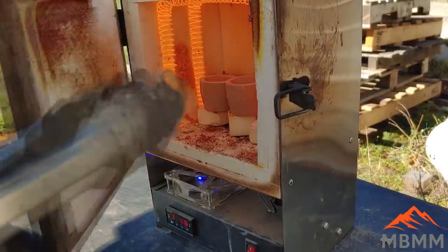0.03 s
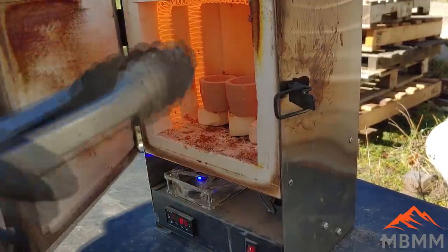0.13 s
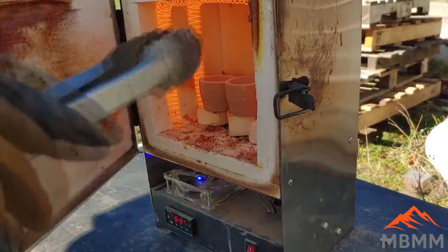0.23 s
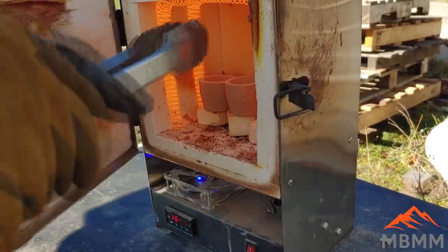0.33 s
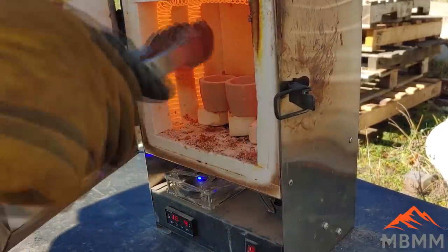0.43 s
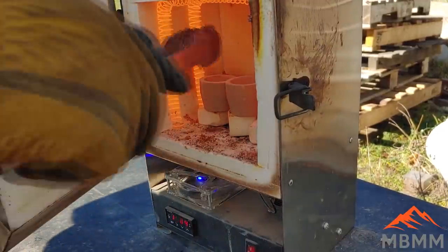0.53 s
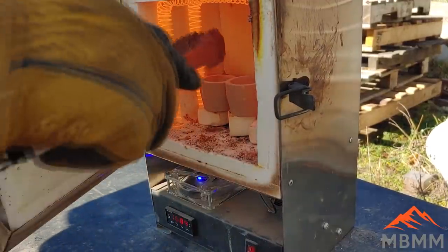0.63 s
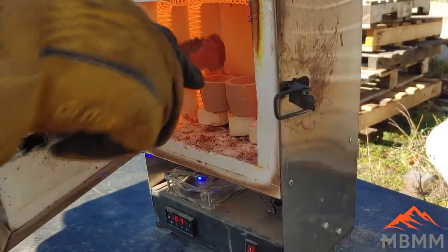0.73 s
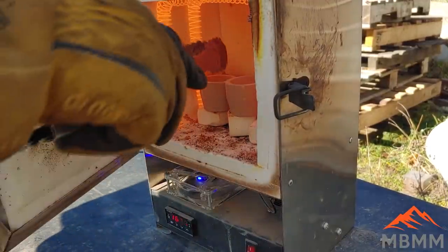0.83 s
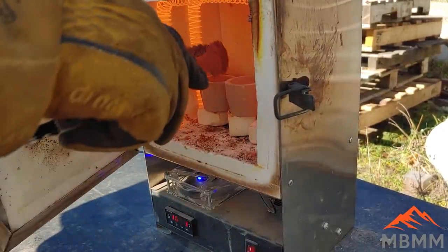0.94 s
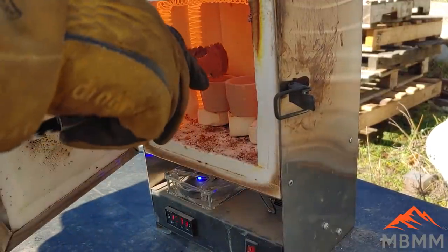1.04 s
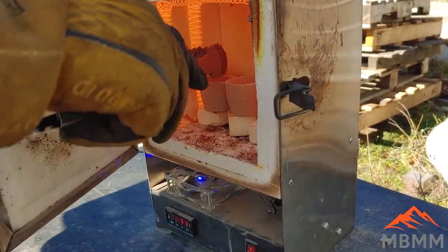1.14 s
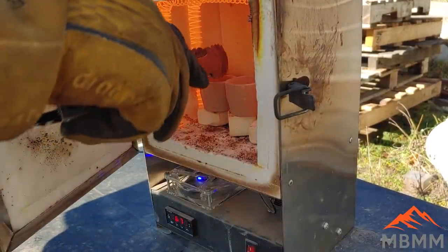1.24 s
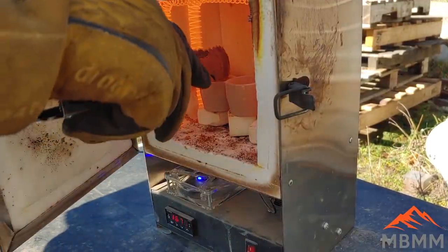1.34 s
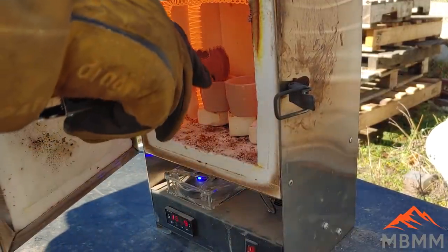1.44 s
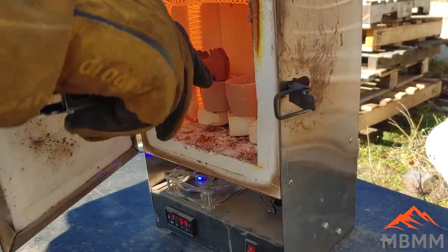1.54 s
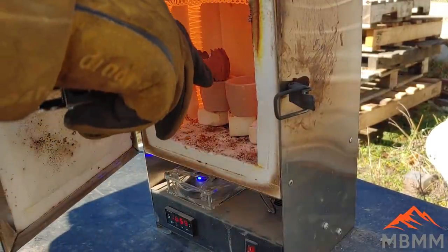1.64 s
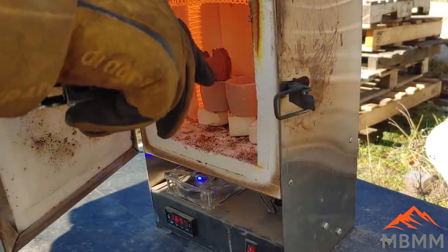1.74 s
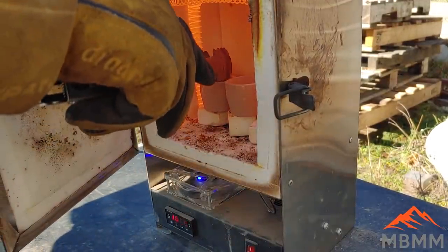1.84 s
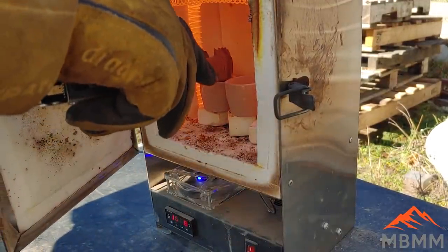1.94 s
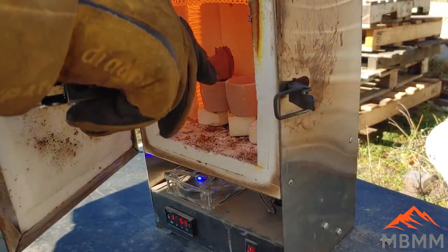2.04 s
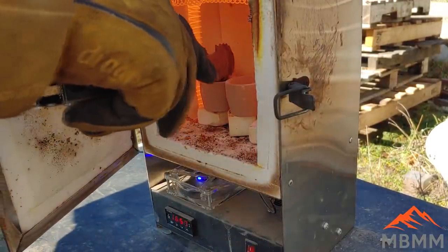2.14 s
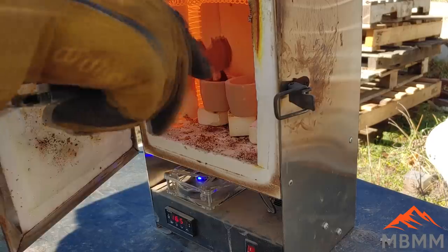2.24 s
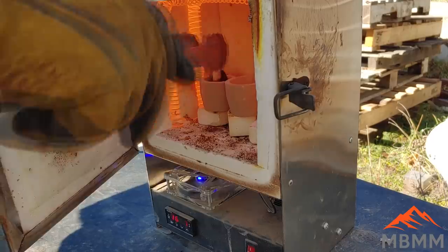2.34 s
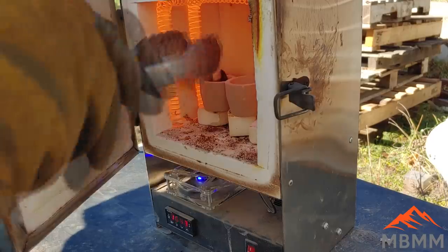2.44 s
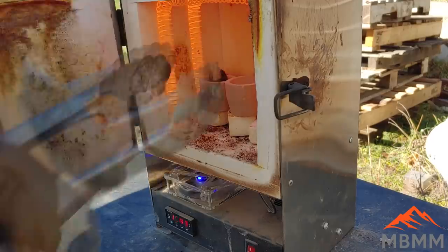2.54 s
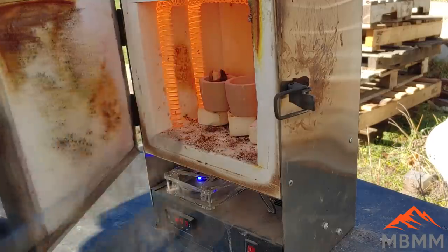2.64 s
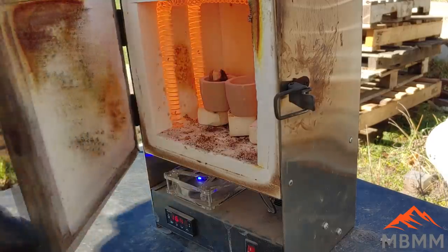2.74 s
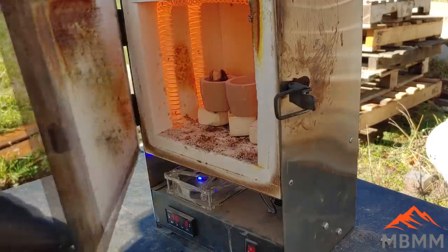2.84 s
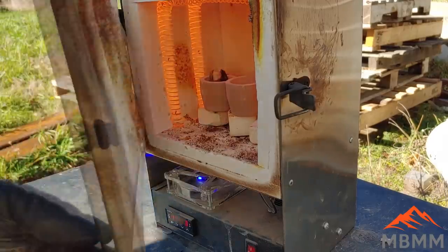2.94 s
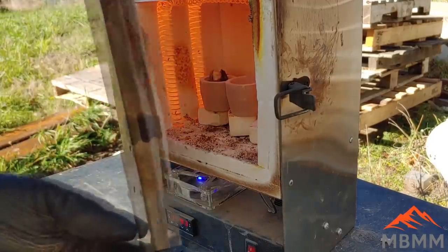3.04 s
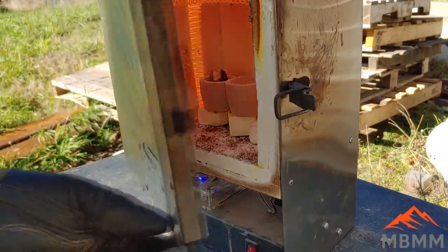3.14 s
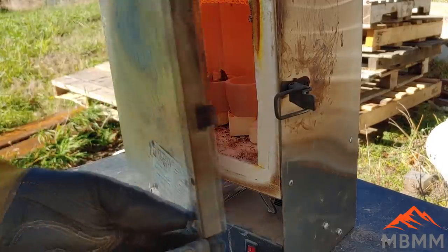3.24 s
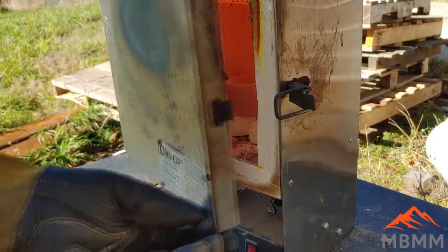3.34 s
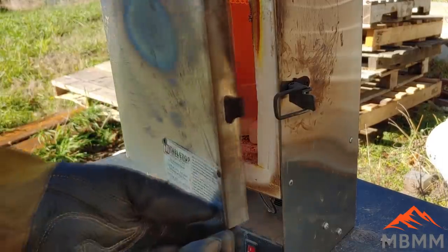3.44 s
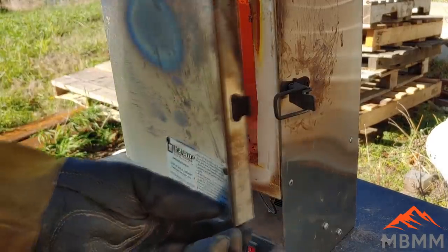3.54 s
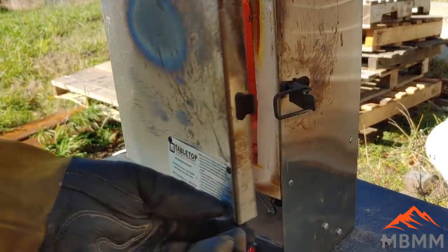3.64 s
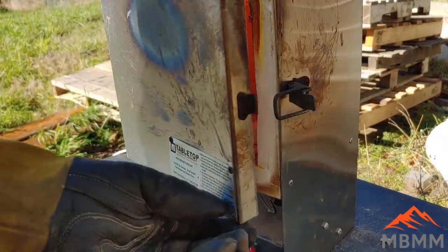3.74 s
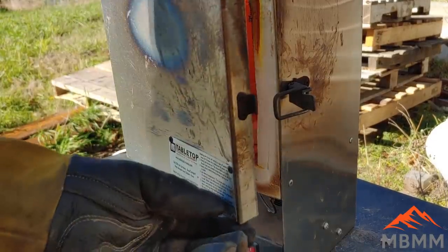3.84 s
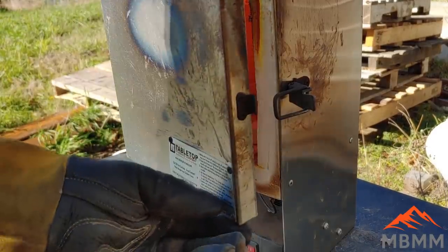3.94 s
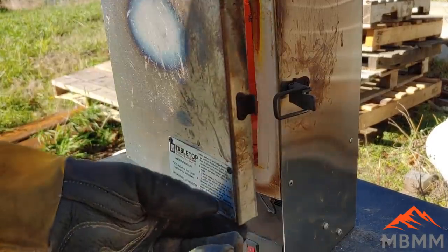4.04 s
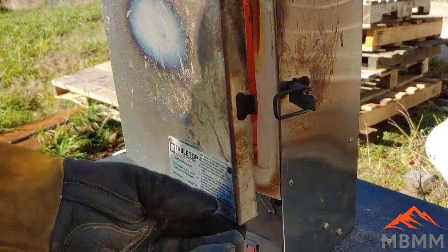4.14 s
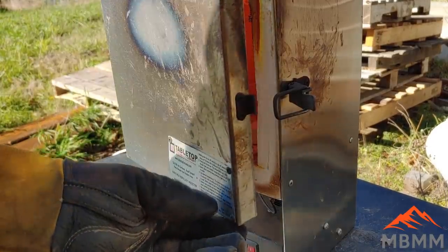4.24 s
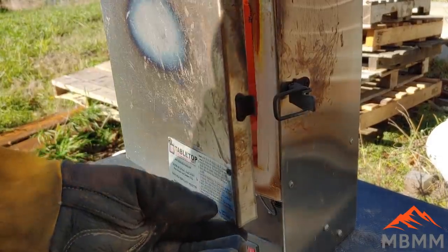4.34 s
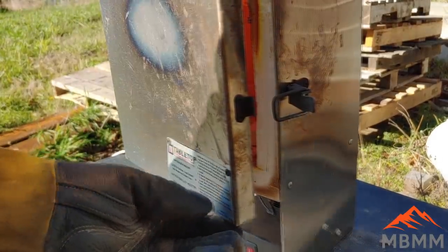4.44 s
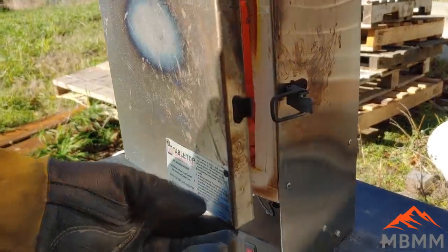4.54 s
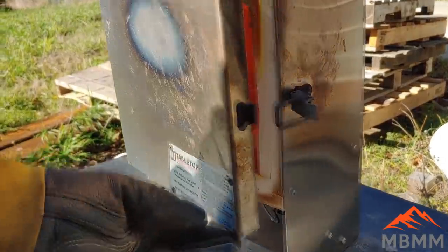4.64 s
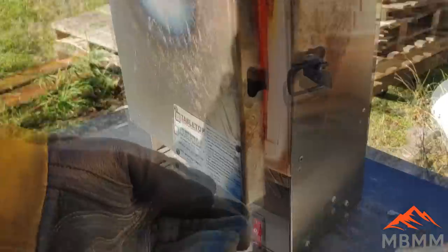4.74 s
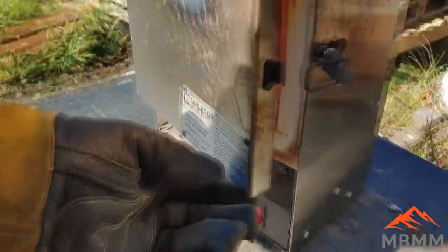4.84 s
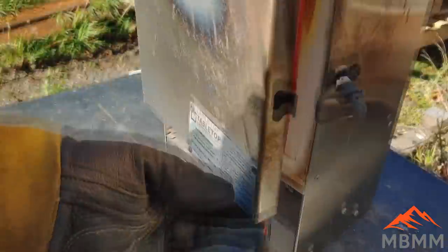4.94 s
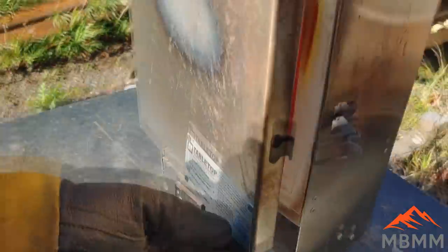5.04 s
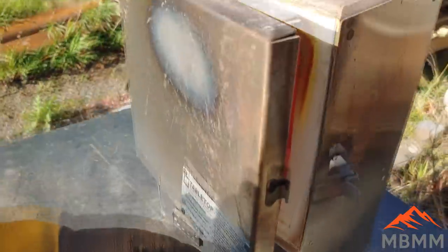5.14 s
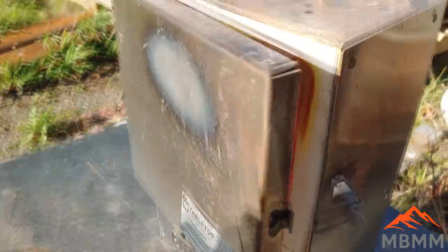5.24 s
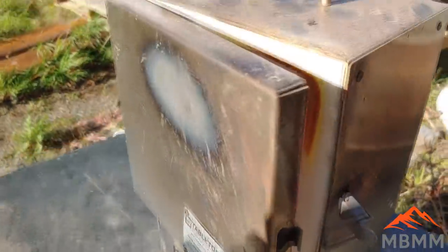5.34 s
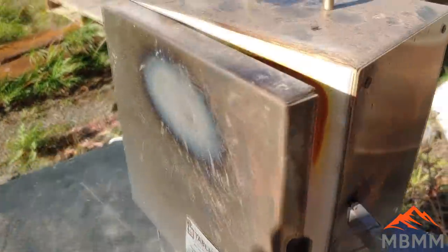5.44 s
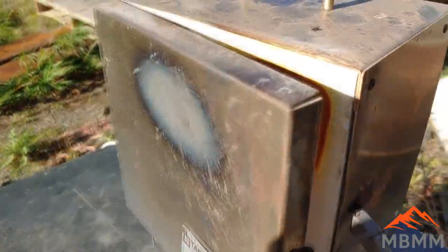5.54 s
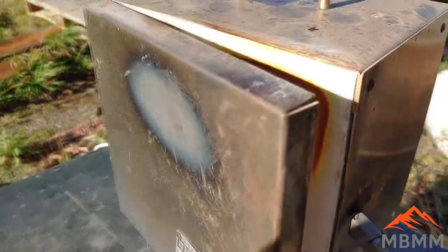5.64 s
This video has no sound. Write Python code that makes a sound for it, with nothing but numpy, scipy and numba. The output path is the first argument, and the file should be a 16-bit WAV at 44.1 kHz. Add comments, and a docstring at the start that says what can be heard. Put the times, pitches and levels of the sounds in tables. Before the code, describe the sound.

A few faint metallic clicks outdoors, then a sheet-steel furnace door clatters, bangs and rattles shut with ringing latch and wind rumble.

```python
"""Furnace door and tongs outdoors

Steel tongs click and scrape on crucibles in a small furnace; then its sheet-steel door bangs and rattles to,
the loose latch rings and the casing booms. Blows and rubbing are noise forces that ring banks of decaying modes.
Wind on the two microphone ports and an open-air hush are shaped noise.
"""
import sys
import numpy as np
from scipy import signal
from scipy.fft import rfft, irfft
from scipy.io import wavfile
from scipy.ndimage import uniform_filter1d
from numba import njit

SR = 44100
rng = np.random.default_rng(int(sys.argv[2]) if len(sys.argv) > 2 else 0)


def bounce(signal):
    """Save signal as a 16-bit WAV file at the path given by the first command-line argument."""
    frames = np.transpose(np.atleast_2d(signal))
    limited = np.clip(frames, -1, 1)
    pcm = np.round(limited * 32767).astype(np.int16)
    wavfile.write(sys.argv[1], SR, pcm)


N = 251628


def undb(db):
    """Amplitude ratio of a level in dB."""
    return 10 ** (np.asarray(db) / 20)


def curve(table):
    """Columns of a table, joined by straight lines in time."""
    time_s, *columns = np.transpose(table)
    return [np.interp(np.arange(N) / SR, time_s, column) for column in columns]


def during(table):
    """1 while a curve table lasts, else 0."""
    t = np.arange(N) / SR
    return (t >= table[0][0]) & (t <= table[-1][0])


def at_hz(table, hz):
    """A spectrum table read on a log-frequency axis."""
    table_hz, value = np.transpose(table)
    return np.interp(np.log(hz), np.log(table_hz), value)


def sides(pan_db):
    """Left and right gains that differ by pan_db."""
    return undb(np.array([pan_db, -pan_db]) / 2)


def coloured(table):
    """Noise of rms 1 with the given spectrum."""
    hz = np.arange(1, N // 2 + 2) * SR / N
    x = irfft(rfft(rng.standard_normal(N)) * undb(at_hz(table, hz)), N)
    return x / np.std(x)


def flutter(depth_db, rate_per_s):
    """Gain that wanders by itself on each port: smoothed random steps in dB."""
    k = int(SR / rate_per_s)
    steps = np.repeat(rng.standard_normal((2, N // k + 1)), k, axis=1)
    smooth = uniform_filter1d(uniform_filter1d(steps, k, axis=1), k // 2, axis=1)
    return undb(depth_db * smooth[:, :N])


def grit(spread_db, apart):
    """Dense tiny impacts of uneven size, rms 1; the fraction apart is independent on each port."""
    size = undb(spread_db * np.minimum(rng.exponential(size=N), 4))
    apart = np.clip(apart, 0, 1)
    shared = np.sqrt(1 - apart) * rng.standard_normal(N)
    x = size * (shared + np.sqrt(apart) * rng.standard_normal((2, N)))
    return x / np.std(x)


def chatter(times_s, db, t60_s, rise_s, pan_db):
    """Force envelope: every blow swells quickly and dies away as chatter."""
    out, t = np.zeros((2, N)), np.arange(SR // 2) / SR
    blows = np.broadcast(times_s, db, np.clip(t60_s, .004, 1), np.clip(rise_s, .0001, .03), pan_db)
    for start_s, level_db, decay_s, up_s, pan in blows:
        i = int(start_s * SR)
        shape = 1000 ** (-t / decay_s) * (1 - np.exp(-t / up_s))
        force = undb(level_db) * sides(pan)[:, None] * shape / shape.max()
        out[:, i:i + len(t)] += force[:, :N - i]
    return out


@njit
def resonate(force, blow, poles, gains, turn):
    """Decaying modes weight the force anew at each blow; the right port hears them phase-turned."""
    out = np.zeros((2, force.shape[1]))
    for m in range(len(poles)):
        left, right = 0j, 0j
        for i in range(force.shape[1]):
            left = left * poles[m] + force[0, i] * gains[blow[i], m]
            right = right * poles[m] + force[1, i] * gains[blow[i], m]
            out[0, i] += left.imag
            out[1, i] += (right * turn[m]).imag
    return out


def ring(force, times_s, modes, scatter_db, turn_rad):
    """A body rung by the force; every blow lands elsewhere and shares its energy among the modes anew."""
    hz, db, t60_s = np.transpose(modes)
    radius = np.exp(-np.log(1000) / (np.clip(t60_s, .005, 2) * SR))
    chance = rng.standard_normal((len(times_s) + 1, len(hz)))
    share = np.sign(chance[::-1]) * undb(db + scatter_db * chance)
    gains = share * np.sqrt(2 * (1 - radius ** 2) / np.sum(share ** 2, axis=1, keepdims=True))
    blow = np.searchsorted(np.asarray(times_s) * SR, np.arange(N))
    turn = np.exp(1j * turn_rad * rng.standard_normal(len(hz)))
    poles = radius * np.exp(2j * np.pi * hz / SR)
    out = resonate(force + 1e-18, blow, poles, gains, turn)  # offset avoids denormals
    edges_hz = [.7 * hz.min(), min(1.12 * hz.max(), .45 * SR)]
    return signal.sosfilt(signal.butter(4, edges_hz, "bandpass", fs=SR, output="sos"), out)


def sheet(colour, lo_hz, hi_hz, count, damping):
    """A random crowd of close modes that follows the colour of the steel."""
    # steel decay: (frequency [Hz], t60 at damping 1 [s])
    decay_table = [(1200, 0.017), (4000, 0.14), (8000, 0.088), (16000, 0.013)]
    hz = lo_hz + (hi_hz - lo_hz) * (np.arange(count) + rng.random(count)) / count
    return np.transpose([hz, at_hz(colour, hz), at_hz(decay_table, hz) / damping])


def steel(colour, times_s, dull, bright, top, damping, count):
    """Sheet steel as a crowd of modes; its middle, treble and top are driven apart."""
    middle_modes = sheet(colour, 1181.0, 4500, count // 2, damping)
    treble_modes = sheet(colour, 4500, 10500, count, damping)
    top_modes = sheet(colour, 10500, 15900, count // 2, damping)
    middle = ring(dull * grit(3.8, 0.57), times_s, middle_modes, 1.55, 3.47)
    treble = ring(bright * grit(6.7, 0.076), times_s, treble_modes, 0.45, 3.97)
    return middle + treble + ring(top * grit(6.2, 1.0), times_s, top_modes, 10.4, 3.0)


def cracks(times_s, db, hz, pan_db):
    """First contact of a blow: a noise burst around its pitch, gone in milliseconds."""
    out, t = np.zeros((2, N)), np.arange(SR // 50) / SR
    for start_s, level_db, pitch_hz, pan in zip(times_s, db, hz, pan_db):
        edges_hz = [.55 * pitch_hz, 1.3 * pitch_hz]
        band = signal.butter(2, edges_hz, "bandpass", fs=SR, output="sos")
        burst = signal.sosfilt(band, rng.standard_normal((3, len(t)))) * np.exp(-t / 0.0019)
        burst = burst[0] + 0.81 * burst[1:]  # shared part + one part per port
        i = int(start_s * SR)
        out[:, i:i + len(t)] += undb(level_db) * sides(pan)[:, None] * burst / np.abs(burst).max()
    return out


def door():
    """Blows and rattle drive the sheet, its clear modes, the latch and the casing."""
    # knocks: (time [s], relative level [dB], dull part [dB], chatter t60 [s], low latch ring [dB],
    # high latch ring [dB], boom [dB], left minus right [dB])
    knock_table = [(3.0543, -31, -6.5, 0.046, -74, -40, -10, 4),
                   (3.1, -35.5, -3.5, 0.057, -72, -57, -14.5, 5),
                   (3.2257, -9, -14, 0.026, -53, -24, -11.5, 0),
                   (3.2534, -10, -22, 0.074, -54, -32, -22.5, 3),
                   (3.2807, -10.5, -45, 0.11, -60, -8, -16.5, 2),
                   (3.3164, -12, -11, 0.061, -49, -28, -13.5, 6),
                   (3.326, -15.5, -8, 0.36, -42, -20, -4, -1.0),
                   (3.4217, -15.5, -34, 0.086, -56, -11, -25, -1),
                   (3.4438, -18, -30, 0.04, -59, -23, -18, -5), (3.496, -9, -23, 0.12, -53, -30, -52, 1),
                   (3.5119, -5.5, -30, 0.047, -19, -9, -66, -1.0),
                   (3.541, -15, -41, 0.037, -28.5, -4.5, -27, -3),
                   (3.5768, -16, -5.5, 0.088, -30.5, -9.5, -12.5, -8.5),
                   (3.626, -29, -20, 0.052, -56, -11, -6, -9), (3.749, -2.5, -2, 0.078, -17, -6, -32, -1.5),
                   (3.7617, -11, -33, 0.086, -33, -25, -15.5, 3),
                   (3.7973, 0.5, -35, 0.022, -47.5, -11, -57, -0.5),
                   (3.8454, -7, -29, 0.066, -25.5, -19, -21, 3),
                   (3.8555, -8.5, -8, 0.07, -27.5, -28, -31, -3), (3.9227, -7, -8.5, 0.1, -56, -28, -27, 2),
                   (3.941, -13, -17, 0.096, -29, -6, -15, 0), (3.961, -6.5, -6, 0.16, -31, -27, -43, 3.5),
                   (3.9984, -28, -30, 0.091, -54, -36, -33, 5),
                   (4.0433, -20.5, 6.5, 0.086, -45, -30, -23, -8.5),
                   (4.0486, -10.5, -5.5, 0.098, -42, -44, -25, 3),
                   (4.3049, -25, 2, 0.077, -51, -36, -7.5, 0), (4.3124, -10.5, -6, 0.093, -47, -26, -26, 1),
                   (4.328, -8, -4.5, 0.093, -36, -33, -25, 6.5),
                   (4.349, -19.5, 1.5, 0.086, -34, -27, -8, -6),
                   (4.4061, -9.5, -1.5, 0.12, -31.5, -34, -17.5, 2),
                   (4.4708, -29, -9, 0.037, -40.5, -49, -0.5, 0),
                   (4.511, -42.5, 6, 0.035, -56, -57, 6.5, -5),
                   (4.6041, -10, -1.5, 0.17, -33, -35, -22, -0.5),
                   (4.6256, -16, -9, 0.07, -34, -26, -38, 14), (4.6374, -28, -6, 0.059, -44, -32, -39, -12),
                   (4.682, -9, 0, 0.1, -46, -39, -26, 0), (4.8327, -6, -7, 0.13, -57, -32, -33, 3),
                   (4.9004, -17.5, -1.5, 0.11, -62, -44, -14, 1.5),
                   (5.005, -25, -1, 0.053, -50, -46, -21, -1),
                   (5.0697, -16.5, -2.5, 0.046, -41, -51, -13.5, 4.5),
                   (5.1652, -17.5, -1.5, 0.15, -44, -54, -20, 2.5),
                   (5.22, -39, 11, 0.07, -48, -60, 2.5, -3),
                   (5.2956, -20.5, -1.5, 0.13, -45, -45, -45, 2.5),
                   (5.358, -32.5, 3, 0.13, -46, -60, -13, 4), (5.4166, -33.5, 9, 0.13, -47, -60, -5.5, -1),
                   (5.486, -38, -8, 0.056, -66, -43, -26, -15), (5.5462, -35, 3, 0.086, -52, -66, -4.5, 1),
                   (5.6154, -45, 12.5, 0.033, -51.5, -63, -1.5, -3)]
    # rubbing and rattling between the blows: (time [s], relative level [dB])
    rattle_table = [(3.2, -55.5), (3.3, -38.5), (3.4, -38.5), (3.49, -34), (3.72, -38.5), (3.96, -34),
                    (4.1, -52), (4.2, -82), (4.3, -58), (4.6, -46), (4.98, -50.5), (5.09, -34.5),
                    (5.22, -60.5), (5.65, -53.5), (5.71, -87)]
    # casing shaken by the door: (time [s], relative level [dB])
    shake_table = [(2.9, -65.5), (3.16, -56.5), (3.4, -28), (3.59, -34), (4.08, -33.5), (4.15, -49.5),
                   (4.54, -52), (4.64, -35), (5.32, -43.5), (5.71, -49)]
    # colour of the close steel modes: (frequency [Hz], relative level [dB])
    steel_colour = [(710, -40), (1200, -17.5), (1770, -13.5), (2000, -12.5), (2680, -15), (3080, -8.5),
                    (3360, -13.5), (4960, -6.5), (5900, -8), (7330, 1), (13300, -23), (15000, -29),
                    (16000, -41)]
    # upper clear modes: (frequency [Hz], relative level [dB], t60 [s])
    upper_modes = [(4490, -7, .22), (4670, -6, .28), (5128, -1, .25), (5470, -6, .15), (5950, -5, .17),
                   (6240, -3, .22), (6500, -2, .22), (6860, 0, .2), (7085, 1, .22), (7200, 0, .17),
                   (7320, 0, .17), (7535, 1, .24), (7810, 1, .26), (8420, 0, .2), (8720, -1, .24),
                   (9200, -4, .17), (10940, -8, .12)]
    # lower clear modes: (frequency [Hz], relative level [dB], t60 [s])
    lower_modes = [(1945, -4, .25), (1975, -4, .25), (2345, 0, .16), (2735, -3, .3), (3400, -4, .25),
                   (3960, -3, .3), (3985, -3, .3), (4385, -4, .15)]
    # casing modes: (frequency [Hz], relative level [dB], t60 [s])
    casing_modes = [(132, -4, 0.085), (168, -6, 0.17), (188, -15.5, 0.092), (231.2, -1.5, 0.25),
                    (280.5, -1, 0.066), (315.9, -0.5, 0.26), (370.2, -4.5, 0.069), (443, -2.5, 0.079),
                    (490, -7.5, 0.064), (558, -10.5, 0.031), (644, -10, 0.04), (766, -14, 0.059),
                    (843, -20, 0.024), (876, -13, 0.036), (998, -10.5, 0.059), (1071, -6.5, 0.057),
                    (1180, -15.5, 0.069)]
    rise_s, swing_s = 0.0014, 3.2

    s, db, dull_db, t60_s, low_db, high_db, boom_db, pan_db = np.transpose(knock_table)
    rattle = undb(curve(rattle_table)[0]) * during(rattle_table) * flutter(4.8, 12)
    rattle = rattle + chatter(s, db - 32, 0.23, 0.0025, 0.0)  # loose parts buzz on after each knock
    blows = chatter(s, db - 9.0, t60_s, rise_s, pan_db)
    dull = chatter(s, db + dull_db - 14, t60_s, rise_s, pan_db) + rattle * undb(-3.5)

    # the sound loses its top as the door closes
    knock_top_db = -12 - 15.5 * (s - swing_s)
    rattle_top_db = -2.5 - 13 * (np.arange(N) / SR - swing_s)
    top = chatter(s, db + knock_top_db, t60_s, rise_s, pan_db) + rattle * undb(rattle_top_db)

    crowd = steel(steel_colour, s, dull, blows + rattle, top, damping=1.9, count=110)
    clear = undb(-3) * ring(blows * grit(2.5, .5), s, upper_modes, 3.5, 1.5)
    clear += undb(-5) * ring(dull * grit(2.5, .4), s, lower_modes, 4., 1.5)
    push = chatter(s, db + boom_db - 3.0, 0.19, 0.00064, -1.9)
    push = push + undb(curve(shake_table)[0]) * during(shake_table) * sides(-1.4)[:, None]
    boom = ring(push * grit(1.9, 0.12), s, casing_modes, 2.3, 0.8)
    contact = cracks(s, db - 8, np.full(len(s), 7060), pan_db)
    rings = latch(s, [low_db, high_db, high_db], pan_db)
    return crowd + clear + contact + rings + boom + hum()


def latch(times_s, rings_db, pan_db):
    """Every blow stops the ring of the loose latch and starts its decaying sines afresh."""
    # latch modes: (frequency [Hz], relative level [dB], t60 [s])
    latch_modes = [(3139, 2, .35), (7991, -12, .14), (9793, -14, .45)]
    t = np.arange(N) / SR
    blow = np.maximum(np.searchsorted(times_s, t) - 1, 0)
    since_s, out = t - times_s[blow], 0
    for (hz, mode_db, t60_s), db in zip(latch_modes, rings_db):
        decay = 1000 ** (-np.abs(since_s) / t60_s) * (since_s > 0)
        size = uniform_filter1d(undb(db[blow] + mode_db) * decay, SR // 500)  # 2 ms smoothing
        phase = 2 * np.pi * (hz * t + np.array([[0], [.2]]))  # ports 0.2 cycle apart
        out = out + size * sides(pan_db[blow]) * np.sin(phase)
    return out


def hum():
    """One low mode of the casing: a sine with 40 ms fades."""
    # (start [s], stop [s], frequency [Hz], level [dB])
    hum_settings = (3.53, 3.79, 84, -30)
    start_s, stop_s, hz, db = hum_settings
    t = np.arange(N) / SR
    swell = np.clip(np.minimum(t - start_s, stop_s - t) / .04, 0, 1)
    return undb(db) * sides(0.0)[:, None] * swell * np.sin(2 * np.pi * hz * t)


def snaps():
    """Further sharp first contacts at some blows: short bursts of band noise."""
    # (time [s], level [dB], pitch [Hz], left minus right [dB])
    snap_table = [(3.2256, -2, 7930, 0.5), (3.5119, 0, 7520, -1.0), (3.5423, -3, 7990, -0.5),
                  (3.7988, 1, 7360, 0.0), (4.2622, -42, 7900, -1.5), (4.4734, -17, 2400, 5.0)]
    return cracks(*np.transpose(snap_table))


def scuffs():
    """Soft, dull rubs of a leather glove on the steel door: enveloped noise."""
    # (time [s], relative level [dB], t60 [s], left minus right [dB])
    scuff_table = [(4.484, -29, 0.14, 16.5), (4.5194, -37.5, 0.13, 22), (4.5494, -45, 0.092, 19),
                   (4.762, -35, 0.1, 25), (4.788, -46, 0.12, 18)]
    # leather rub: (frequency [Hz], relative level [dB])
    glove_colour = [(150, -80), (600, -1), (950, -2), (1300, -2.5), (1900, -13), (2800, -41), (9000, -90)]
    s, db, t60_s, pan_db = np.transpose(scuff_table)
    own = np.array([coloured(glove_colour), coloured(glove_colour)])
    return chatter(s, db - 16.5, t60_s, 0.0085, pan_db) * (coloured(glove_colour) + 1.44 * own)


def tongs():
    """Light, well damped clicks, some with a thud, over soft rubbing."""
    # clicks: (time [s], relative level [dB], dull part [dB], relative chatter t60 [s], thud [dB],
    # left minus right [dB])
    click_table = [(0.0024, -47, -28, 0.046, -30, 8), (0.1077, -22.5, -20, 0.032, -43, -6),
                   (0.184, -32, -32, 0.037, -28, -2), (0.4216, -53, -19, 0.066, -19, -1.5),
                   (1.3862, -16, -6.5, 0.013, -22.5, -2), (1.4886, -12.5, -3.5, 0.014, -26.5, 0),
                   (1.655, -38, -2, 0.16, -15, -3), (1.6732, -19, -31, 0.072, -35, -4.5),
                   (1.7559, -30, -41, 0.32, -19, -2), (1.798, -33.5, -12, 0.057, -24, -7),
                   (1.8158, -32.5, 2, 0.04, -8, 0.0), (1.887, -22.5, -32, 0.037, -23.5, 0),
                   (2.615, -36, -2, 0.15, -13, -4), (2.6456, -38, -1, 0.1, -17.5, 1),
                   (2.8863, -40, -21, 0.033, -12.5, -3)]
    # rubbing in the glove and on the crucibles: (time [s], relative level [dB])
    rub_table = [(0.0, -67.5), (0.07, -73.5), (0.16, -59.5), (0.34, -75), (0.6, -81.5), (1.0, -74),
                 (1.37, -57), (1.46, -58.5), (1.64, -55.5), (1.75, -53.5), (1.87, -59.5), (1.93, -53),
                 (2.15, -54.5), (2.5, -54.5), (2.64, -52), (2.71, -62), (2.77, -50), (2.83, -58),
                 (2.89, -49.5), (3.0, -59.5), (3.07, -43), (3.22, -49)]
    # colour of the rubbed steel: (frequency [Hz], relative level [dB])
    rub_colour = [(710, -57), (1200, -21.5), (1680, -17.5), (3320, -21.5), (5300, -15), (6030, -10),
                  (6870, -4), (7740, 0), (8440, -2.5), (13900, -29), (16000, -52)]
    # jaw modes: (frequency [Hz], relative level [dB], t60 [s])
    jaw_modes = [(1770, 4, 0.025), (2660, -18, 0.074), (3690, 19, 0.03), (4600, -39.5, .04),
                 (6250, -8, 0.17), (8040, 28, 0.11), (7800, -4, .06), (8300, 4, .1), (9480, 5, 0.27)]
    # furnace casing struck by the tongs: (frequency [Hz], relative level [dB], t60 [s])
    thud_modes = [(151, -0.5, 0.12), (336, -7.5, 0.13), (625, -13.5, 0.086)]
    rise_s = 0.00045

    s, db, dull_db, t60_s, thud_db, pan_db = np.transpose(click_table)
    rub_db, = curve(rub_table)
    rub = undb(rub_db) * during(rub_table) * flutter(3.6, 12)
    after = chatter(s, db - 41, 0.12, 0.0016, pan_db)  # jaws slide on for a moment
    bright = chatter(s, db - 9.5, t60_s, rise_s, pan_db) + rub + after
    dull = chatter(s, db + dull_db - 17.0, 0.76 * t60_s, rise_s, pan_db) + after
    dull = dull + rub * undb(-11 - 0.46 * (rub_db + 60))  # firmer rubbing is brighter
    thud_force = chatter(s, db + thud_db - 3, 0.042, 0.0016, pan_db) * grit(3.7, 0.043)
    thud = ring(thud_force, s, thud_modes, 2.2, 0.3)
    jaws = undb(-15.5) * ring(bright * grit(2.2, 0.54), s, jaw_modes, 1.0, 1.9)
    return steel(rub_colour, s, dull, bright, undb(-17) * bright, damping=2.74, count=60) + jaws + thud


def wind():
    """Unrelated rumble on each port, a narrow moan, and single pressure puffs."""
    # (time [s], relative level [dB], left minus right [dB])
    wind_table = [(0.0, -55, 14), (0.1, -65, 5), (0.4, -67, -2), (1.25, -65, -2), (1.75, -55.5, 4.5),
                  (2.2, -64, -0.5), (2.55, -61.5, 4), (2.65, -54.5, 10), (2.8, -59, 4), (2.95, -49, 10),
                  (3.22, -48.5, 3), (3.36, -32, -3), (3.55, -44, -4), (3.82, -37.5, -8), (3.99, -23.5, 9),
                  (4.07, -34, -2), (4.24, -33.5, -6), (4.33, -29, 9), (4.42, -31.5, -5), (4.59, -32, 2),
                  (4.67, -31.5, -14), (5.1, -46, 5), (5.2, -32.5, -16), (5.3, -38, -1), (5.5, -23, -9.5),
                  (5.71, -32.5, -2)]
    # rumble: (frequency [Hz], relative level [dB])
    gust_colour = [(15, -19), (25, 6), (40, -2), (75, 0.5), (110, -2.5), (150, -9.5), (300, -45.5),
                   (1500, -110)]
    # narrow low moan: (frequency [Hz], relative level [dB])
    moan_colour = [(12, -86), (30, -34), (48, 2), (56, 0.5), (65, -1.5), (95, -39), (400, -110)]
    # the moan swells and fades: (centre [s], relative level [dB], half length to 1/e [s])
    swell_table = [(0.654, -58, 0.059), (1.06, -51.5, 0.074), (1.4, -48, 0.046), (1.525, -47.5, 0.051),
                   (1.78, -50, 0.05), (2.017, -57, 0.12), (2.66, -53, 0.065)]
    # puffs on the ports, peaking 6 ms after: (time [s], level [dB], pitch [Hz], left minus right [dB])
    puff_table = [(5.353, -17, 107, -26.5), (5.395, -20, 95.5, 5), (5.468, -29, 69, -16),
                  (5.492, -12, 82.5, -19), (5.598, -38, 112, 2)]

    t = np.arange(N) / SR
    db, pan_db = curve(wind_table)
    rumble = np.array([coloured(gust_colour), coloured(gust_colour)])
    gust = undb(db - 2.0) * flutter(3.5, 17) * rumble
    moan = coloured(moan_colour) + 0.29 * np.array([coloured(moan_colour), coloured(moan_colour)])
    swells = sum(undb(d) * np.exp(-((t - s) / half_s) ** 2) for s, d, half_s in swell_table)
    moan_gain = undb(-62 + 0.69 * (db + 60)) + swells  # moan grows 0.69 dB per dB of wind
    out = sides(pan_db) * (gust + moan_gain * moan)
    for s, peak_db, hz, pan in puff_table:
        cycles = (t - s - .006) * hz
        puff = np.cos(2 * np.pi * cycles) * np.exp(-(cycles / 0.32) ** 2)
        out = out + undb(peak_db) * sides(pan)[:, None] * puff
    return out


def hush():
    """Distant open-air noise, partly shared by both ports."""
    # (frequency [Hz], relative level [dB])
    hush_colour = [(59, -36), (100, 4.5), (153, -23), (192, 0.5), (260, -5), (384, -9.5), (408, -3),
                   (625, -6.5), (736, -4.5), (1080, -7.5), (1360, -14.5), (2650, -27.5), (13000, -29)]
    mid, side = coloured(hush_colour), coloured(hush_colour)
    return undb(-67.5) * (mid + 0.64 * side * np.array([[1], [-1]]))


def scene():
    """Sum of the sources on the two ports."""
    return door() + snaps() + scuffs() + tongs() + wind() + hush()


def record(dry):
    """Peaks clip at 0.97 of full scale; a steep low-pass then cuts the top."""
    top_hz = 16200
    return signal.sosfilt(signal.ellip(10, .2, 80, top_hz, fs=SR, output="sos"), np.clip(dry, -.97, .97))


dry = scene()
out = record(dry)
bounce(out)
```